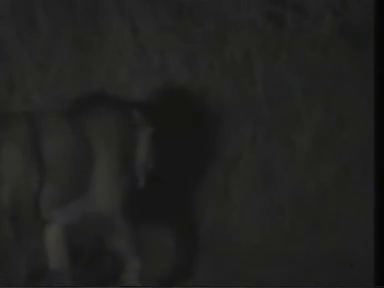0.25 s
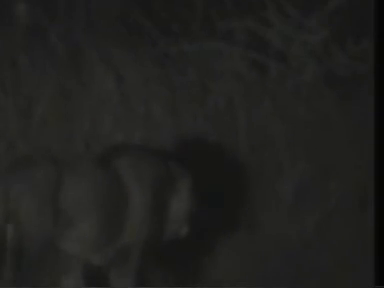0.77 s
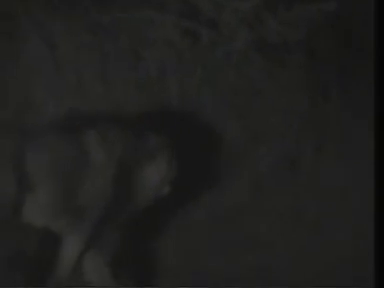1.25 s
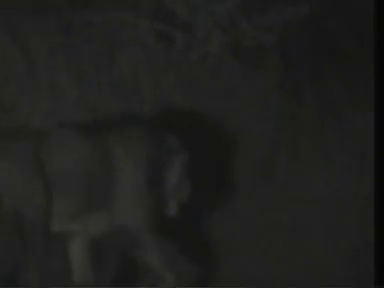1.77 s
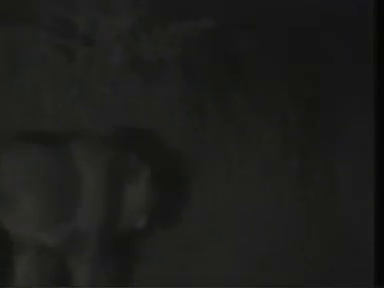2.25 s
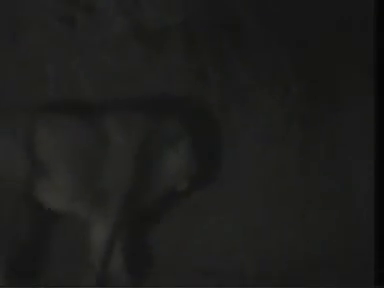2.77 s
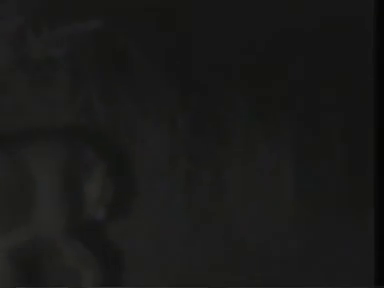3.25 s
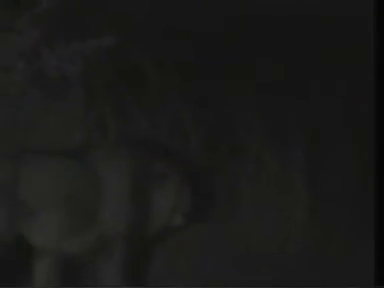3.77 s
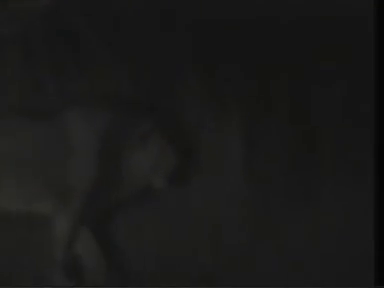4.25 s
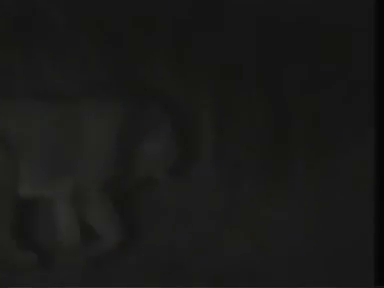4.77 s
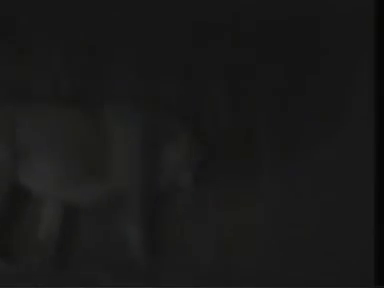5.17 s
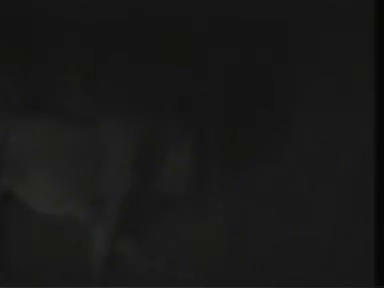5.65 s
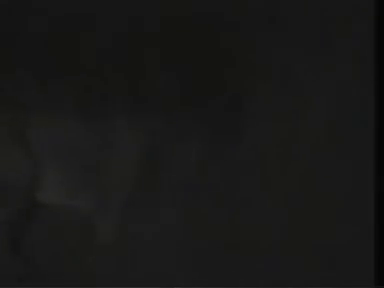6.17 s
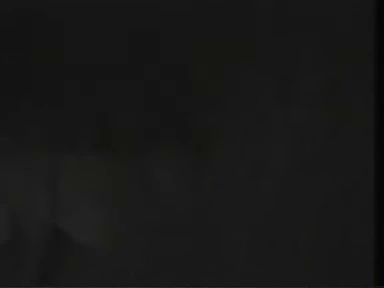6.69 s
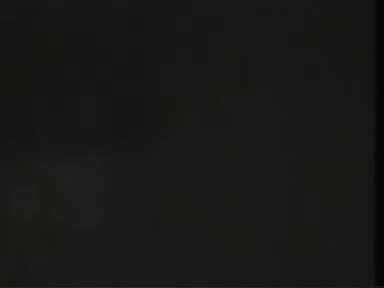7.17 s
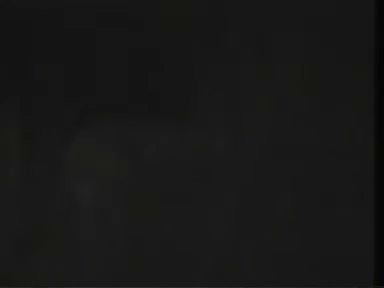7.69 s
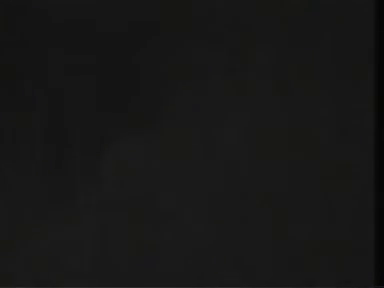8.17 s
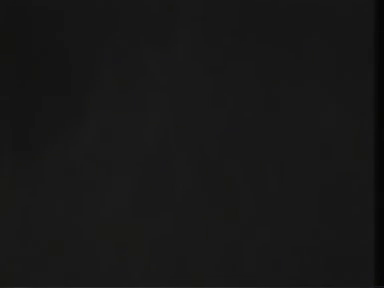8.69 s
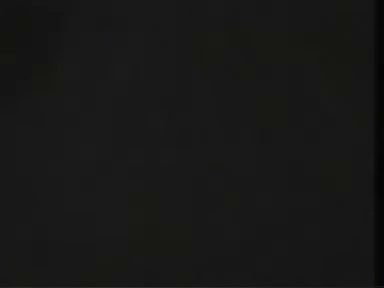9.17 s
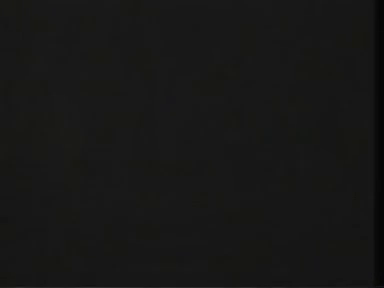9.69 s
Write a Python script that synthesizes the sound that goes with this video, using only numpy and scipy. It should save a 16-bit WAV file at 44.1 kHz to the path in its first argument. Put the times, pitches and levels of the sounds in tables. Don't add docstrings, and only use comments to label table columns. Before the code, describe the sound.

Three deep, almost pure-toned lion roars with raspy, breathy edges come first, followed by eight brief grunts about three quarters of a second apart, slowly fading. Behind them are a low fluttering engine, a wavering hum, a couple of dull rattling knocks, constant camera hiss with thin motor whine, and low wind puffs. Open grassland gives only a slight scattered tail; the raw one-sided pickup favours the right.

```python
import sys
import numpy as np
from scipy import signal
from scipy.fft import rfft, irfft, next_fast_len
from scipy.io import wavfile
from scipy.ndimage import uniform_filter1d, map_coordinates

SR = 44100
rng = np.random.default_rng(int(sys.argv[2]) if len(sys.argv) > 2 else 0)


def to_linear_factor(level_db):
    exponent = np.asarray(level_db, float) / 20
    return 10 ** exponent


def to_wav(sig):
    pcm = np.clip(np.atleast_2d(sig), -1, 1) * 32767
    pcm = np.round(pcm).astype(np.int16)
    wavfile.write(sys.argv[1], SR, pcm.T)


N = 437913
TIME = np.arange(N) / SR

# full voice t/s, hold/s, chest tone level/dB, lowest throat resonance f/Hz, mouth opening level/dB
GRUNTS = [
    (4.657, 0.066, -15, 175, -21.5),
    (5.466, 0.091, -18, 180.3, -10.5),
    (6.255, 0.083, -17, 172, -10),
    (7.002, 0.067, -16.5, 170, -10),
    (7.704, 0.066, -16.5, 166.3, -11),
    (8.387, 0.056, -16.5, 169.3, -8.5),
    (9.052, 0.054, -18, 164.4, -8.5),
    (9.704, 0.061, -18.5, 165, -7),
]


def unit(x):
    return x / np.sqrt(np.mean(np.abs(x) ** 2) + 1e-20)


def curves(rows):
    s, *cols = np.transpose(rows)
    return [np.interp(TIME, s, c) for c in cols]


def wobble(rate, depth_db=None):
    coarse = np.arange(0, N + 64, 64)
    knots = rng.standard_normal(int(N * rate / SR) + 4)
    smooth = map_coordinates(knots, [coarse * rate / SR])
    return np.interp(np.arange(N), coarse, smooth if depth_db is None else to_linear_factor(depth_db * smooth))


def along(points, hz):
    f, v = np.transpose(points)
    return np.interp(np.log(hz + 1), np.log(f + 1), v)


def noise(spectrum):
    m = next_fast_len(N)
    gain = to_linear_factor(along(spectrum + [(SR / 2, -120)], np.fft.rfftfreq(m, 1 / SR)))
    return unit(irfft(rfft(rng.standard_normal(m)) * gain, m)[:N])


def resonate(x, modes, shift=1, drift_db=0):
    turns = 2 * np.pi * np.cumsum(np.ones(N) * shift) / SR
    out = np.zeros(N)
    for hz, width_hz, db in modes:
        spin, pole = np.exp(1j * hz * turns), np.exp(-np.pi * width_hz / SR)
        still = signal.lfilter([1], np.convolve([1, -pole], [1, -pole ** 2]), x * spin.conj())
        still = still / np.sqrt(uniform_filter1d(np.abs(unit(still)), size=1800) + .2)
        out += to_linear_factor(db) * wobble(14, drift_db) * np.real(unit(still) * spin)
    return unit(out)


def puffs(rate, scatter, spread_db, life):
    beat = np.floor(np.cumsum(rate * (1 + scatter * wobble(30))) / SR)
    starts = np.diff(beat, prepend=0) > 0
    draws = to_linear_factor(spread_db * rng.standard_normal(int(N * 120 / SR)))
    sizes = draws[np.clip(beat, 0, None).astype(int)]
    return unit(signal.lfilter([1], [1, -np.exp(-1 / (life * SR))], starts * sizes))


def engine(drone_db):
    # f/Hz, spectral level/dB per Hz
    body_spectrum = [(35, -46.5), (60, -19.5), (113, -6.5), (155, 1), (200, -11), (260, -10), (380, -14),
                     (450, -8.5), (650, -10.5), (1030, -16), (1370, -15), (2000, -27), (2600, -54)]
    firing_hz = 16.5 + 0.92 * TIME
    firing = puffs(firing_hz, scatter=0.033, spread_db=-2.5, life=0.026)
    throb = .9 + np.interp(TIME, [0, 9.9], [1.3, .3]) * firing
    stolen_db = 0.85 * np.clip(drone_db + 45.5, 0, None)
    level_db = -57.5 + 0.44 * TIME - stolen_db + 4.0 + 1.7 * wobble(3.04)
    return unit(noise(body_spectrum) * throb) * to_linear_factor(level_db)


def knocks():
    # t/s, peak level/dB, body t60/s, crack level/dB
    hits = [
        (6.493, -31, .2, -1),
        (9.3805, -24, .07, -3),
    ]
    # f/Hz, width/Hz, level/dB
    panel = [(600, 710, 11.5), (840, 40, -9), (1093, 27, -1.5)]
    # f/Hz, width/Hz, level/dB
    crack = [(1300, 600, 0), (1750, 500, -1), (5500, 5500, -12)]

    def dying(s, db, t60):
        return np.clip((TIME - s) / 0.002, 0, 1) * to_linear_factor(db - 60 * np.clip(TIME - s, 0, 1) / t60)

    thud = sum(dying(s, db - 4.5, t60) for s, db, t60, _ in hits)
    snap = sum(dying(s, db + crack_db, 0.088 * t60) for s, db, t60, crack_db in hits)
    shake = rng.standard_normal(N)
    return thud * resonate(shake, panel) + snap * resonate(shake, crack)


def vehicle():
    # t/s, level/dB
    drone_levels = [(0, -66), (.7, -64), (1.68, -62), (1.8, -53.5), (2.2, -49.5), (3.3, -47), (4.3, -50.5),
                    (5.2, -54.5), (6, -53), (6.75, -46), (7.4, -48), (8.1, -52.5), (8.8, -62),
                    (9.45, -45.5), (9.93, -53)]
    drone_db, = curves(drone_levels)
    turns = np.cumsum(418 + 2.42 * wobble(10)) / SR
    drone = np.sin(2 * np.pi * turns) * to_linear_factor(drone_db - 0.5 + 0.95 * wobble(21))
    return engine(drone_db) + drone + knocks()


def camera():
    # t/s, level/dB
    camera_levels = [(0, -55), (3.1, -55.5), (6.3, -52), (9.93, -50.5)]
    # f/Hz, spectral level/dB per Hz
    housing = [(880, -36), (1500, -1.5), (2030, -2.5), (2520, -1), (2600, 0.5), (2900, 2.5), (3070, -0.5),
               (3420, 2), (3810, -4.5), (5280, -8), (6420, 0), (7890, -15), (9700, -10.5), (11400, -22),
               (15700, -46.5)]
    order_db = [-62.5, -65.5, -72.5, -69.5, -74, -71.5, -66.5, -65.5, -65, -76, -74.5, -77]
    # f/Hz, level/dB rms
    gears = [(1168, -69.5), (1981, -75), (2627, -71), (3214, -74.5), (3370, -72.5), (3533, -73),
             (3585, -75), (5760, -75), (5981, -81.5), (6205, -68.5), (6255, -76), (6428, -71.5),
             (6481, -71.5), (9588, -82.5)]
    motor_hz, orders = 222.6, np.array([2, 4, 8, 9, 10, 11, 12, 13, 15, 18, 19, 20])
    level_db, = curves(camera_levels)
    speed = np.cumsum(1 + .0006 * wobble(12)) / SR
    lines = np.zeros(N)
    for hz, db in [*zip(motor_hz * orders, order_db), *gears]:
        line = np.sin(2 * np.pi * (hz * speed + rng.random()))
        lines += to_linear_factor(db + 4.0) * wobble(25, depth_db=3.0) * line
    hiss = noise([(20, -65), (900, -17)] + housing[1:]) * to_linear_factor(0.37 * wobble(14))
    return to_linear_factor(level_db - 1.76) * hiss + to_linear_factor(level_db - level_db.mean() - 1.63) * lines


def wind():
    # t/s, peak level/dB
    gusts = [(.01, -39), (.22, -35), (.41, -33), (.58, -38), (.9, -30), (1.35, -56), (1.98, -43),
             (2.35, -35), (3.4, -48), (3.76, -40), (4.17, -28.5), (4.749, -29), (5.09, -40), (5.4, -39),
             (5.75, -36.5), (5.97, -45), (6.65, -46), (7.109, -58), (9.099, -42), (9.801, -40)]
    # f/Hz, spectral level/dB per Hz
    buffet = [(15, -6.5), (30, -6.5), (50, 1), (90, -6.5), (140, -38.5), (250, -64)]
    # t/s, peak level/dB
    bumps = [
        (0.189, -46),
        (0.41, -34),
        (1.921, -31),
        (2.332, -44),
        (4.144, -54),
    ]
    calm_db, rise, fall = -53.5, 165, 210
    t = TIME[::64]
    level_db = np.max([db - np.maximum(rise * (s - t), fall * (t - s)) for s, db in gusts], axis=0)
    level_db = np.interp(TIME, t, level_db.clip(calm_db))
    pushes = np.zeros(N)
    for s, db in bumps:
        cycle = np.sin(2 * np.pi * 50 * (TIME - s)) * (TIME > s)
        pushes += to_linear_factor(db - 9.0) * cycle * np.exp(-np.abs(TIME - s) / 0.032)
    return to_linear_factor(level_db - 10.5) * unit(noise(buffet) * to_linear_factor(4.5 * wobble(18))) + pushes


def arch(chest_hz):
    roar_arches = [
        (0.933, 1.024, 1.12, 285, -7),
        (2.45, 2.524, 2.66, 250.6, -12.5),
        (3.619, 3.687, 3.76, 238.4, -6),
    ]
    grunt_arches = [(s - 0.0249, s + 0.034, s + .11, 1.28 * hz, -12 - .8 * k)
                    for k, (s, _, _, hz, _) in enumerate(GRUNTS)]
    lift_hz, gain = np.zeros(N), np.zeros(N)
    for start, top, end, top_hz, db in roar_arches + grunt_arches:
        climb = np.interp(TIME, [start, top, end], [0, 1, 0])
        lift_hz += climb ** .8 * (top_hz - chest_hz)
        gain += to_linear_factor(db - 2.5 * climb) * np.clip(3 * climb, 0, 1)
    turns = np.cumsum((chest_hz + lift_hz) * (1 + 0.036 * wobble(70))) / SR
    return np.sqrt(2) * gain * to_linear_factor(2.6 * wobble(60)) * np.sin(2 * np.pi * turns)


def chest(chest_hz, phase, rasp_db, blows):
    # t/s, depth level/dB, half width/s
    slips = [(.965, 1.5, 0.02), (1.01, 11, 0.024), (1.077, 12, 0.015), (1.145, -4.5, 0.031),
             (1.224, 10, 0.0079), (1.47, 3, 0.0099), (2.491, 3, 0.0086), (2.53, 1.5, 0.0084),
             (2.783, 12, 0.027), (3.652, 7, 0.0052), (3.7, 11, 0.0098), (4.71, 18, 0.013),
             (5.49, 11, 0.0087), (5.516, 21, 0.0055), (6.321, 7, 0.0063), (7.03, 8.5, 0.0077),
             (7.107, 1, 0.0048), (8.419, 28, 0.0066), (9.111, 3, 0.0042), (9.742, 28, 0.0094)]
    t = TIME[::16]
    slip_db = np.interp(TIME, t, sum(db * np.exp(-((t - s) / width) ** 2) for s, db, width in slips))
    rough = np.clip((rasp_db + 17) / 28, .025, .3)
    tone = np.sin(phase) + to_linear_factor(-31.0) * np.sin(2 * phase)
    tone = np.sqrt(2) * to_linear_factor(1.1 * wobble(50) - slip_db) * tone
    drive = blows + 0.81 * rng.standard_normal(N)
    rattle = resonate(drive, [(1, 34.2, 0), (1.4, 42.6, -5.5)], chest_hz)
    return np.sqrt(1 - rough) * tone + np.sqrt(rough) * rattle + arch(chest_hz)


def throat(drive, shut, depth):
    # f/Hz, width/Hz, level/dB
    middle = [(431.3, 57, 8.5), (315, 15, -8)]
    # f/Hz, width/Hz, level/dB
    pharynx = [(626.4, 48, 0), (548, 13, -8.5), (703, 5.8, -21.5)]
    rasp = resonate(drive, middle, 1.014 - depth * shut ** 1.78, drift_db=3.0)
    late_db = 4 * shut ** 3
    pharynx_db = -7 - 0.85 * TIME + late_db / 2
    upper = resonate(drive, pharynx, 1 - depth * shut / 2, drift_db=2.7)
    return to_linear_factor(-late_db) * rasp + to_linear_factor(pharynx_db) * upper


def mouth(drive, shut):
    # f/Hz, width/Hz, level/dB
    mouth_open = [(823, 43, -8.5), (950, 78, 2), (1089, 107, 0), (1205, 106, 2.5), (1500, 370, -6)]
    # f/Hz, width/Hz, level/dB
    mouth_shut = [(953, 38, -7.5), (1165, 100, -4), (1488, 145, 4), (1647, 19, -6.5)]
    early = resonate(drive, mouth_open, drift_db=4.0)
    late = resonate(drive, mouth_shut, drift_db=4.0)
    return np.sqrt(1 - shut) * early + np.sqrt(shut) * late


def grunt(full, hold, db, hz):
    end = full + hold
    dropped = end + .045
    s = [full - .06, full - .026, full, full + .034, end, dropped, dropped + .065, dropped + .065 + .035]
    scoop, sag, fall = .05, .065, .15
    lost = np.array([scoop, scoop / 2, 0, sag / 2, sag, (sag + fall) / 2, fall, fall])
    under_db = np.array([29, 7, 0, 2, 0, 13, 21, 36])
    air_under_db = np.array([22, 16.5, 11, 0, 2, 6, 15, 24])
    return list(zip(s, hz * (1 - lost), db - under_db, db - 16.5 - air_under_db))


def lion():
    # t/s, lowest throat resonance f/Hz, chest tone level/dB, air flow level/dB
    roars = [
        [(.883, 186.2, -37, -48.5), (.935, 197.2, -14.5, -38), (.96, 215, -23.5, -32.5),
         (1.036, 199.5, -24, -28), (1.104, 177, -19.5, -33.5), (1.33, 169, -17.5, -33), (1.45, 158, -21, -34.5),
         (1.55, 150, -33, -37), (1.64, 136, -45, -58)],
        [(2.401, 179, -46.5, -52), (2.429, 182.2, -22.5, -47.5), (2.469, 184.5, -14.5, -37),
         (2.533, 178.6, -16.5, -29), (2.561, 170.8, -13.5, -35.5), (2.669, 153.3, -20.5, -40),
         (2.761, 157.6, -20, -33.5), (2.823, 136.4, -33, -42.5), (2.88, 140, -45, -43.5)],
        [(3.597, 178, -38, -55), (3.625, 184, -22.5, -39.5), (3.658, 178, -22.5, -36.5), (3.716, 169, -21, -33),
         (3.754, 159.2, -20, -36), (3.812, 156.3, -31, -39.5), (3.852, 137.1, -29.5, -39),
         (3.972, 133, -30.5, -42.5), (4.02, 130.8, -50, -55)],
    ]
    # f/Hz, width/Hz, level/dB
    breath_modes = [(2270, 300, 8.5), (3120, 230, -3.5), (3630, 1760, 8), (5290, 2700, -6)]
    calls = roars + [grunt(*row[:-1]) for row in GRUNTS]
    rows = []
    for call in calls:
        first, last = call[0], call[-1]
        rows += [(first[0] - .03, first[1], -75, -85), *call, (last[0] + 0.03927, last[1], -75, -85)]
    chest_hz, chest_db, air_db = curves(rows)

    edges = [row[0] for call in calls for row in (call[0], call[-1])]
    shut = np.interp(TIME, edges, [0, 1] * len(calls))
    sink = [0.099, 0.13, 0.46] + [.16] * len(GRUNTS)
    depth = np.interp(TIME, edges, np.repeat(sink, 2))
    opening = [-14, -13.5, -15.5] + [row[-1] for row in GRUNTS]
    opening_db = np.interp(TIME, edges, np.repeat(opening, 2))

    rasp_db = air_db - chest_db
    snarl_db = opening_db - 3 * shut + (1 - .3) * rasp_db
    trailing_air_db = np.interp(TIME - 0.023, TIME, air_db)
    breath_db = -53.5 + 0.91 * TIME + 0.93 * (trailing_air_db + 33) - chest_db

    flaps = puffs(45 * np.ones(N), scatter=.25, spread_db=2.5, life=0.011)
    blows = unit(np.diff(flaps, prepend=0).clip(0))
    phase = 2 * np.pi * np.cumsum(chest_hz * (1 + 0.01977 * wobble(45))) / SR
    air = unit(rng.standard_normal(N) * (0.8 + 0.3 * np.sin(phase)) * (1.3 + flaps))

    voice = chest(chest_hz, phase, rasp_db, blows)
    voice = voice + to_linear_factor(rasp_db + 0.5) * throat(air + .5 * blows, shut, depth)
    voice = voice + to_linear_factor(snarl_db) * mouth(air + 0.33 * blows, shut)
    voice = voice + to_linear_factor(breath_db) * resonate(air, breath_modes, drift_db=1.0)
    head = signal.butter(4, 100, "high", fs=SR, output="sos")
    radiated = signal.sosfilt(head, to_linear_factor(chest_db - 0.56) * voice)
    under = shut * to_linear_factor(-29 + 4 * wobble(20)) * np.sin(phase / 2)
    return to_linear_factor(chest_db) * under + radiated


def bush(x):
    # f/Hz, t60/s
    ground = [(100, 0.39), (500, 0.26), (2000, 0.51), (8000, 0.22)]
    hz, t, z = signal.stft(rng.standard_normal(SR // 3), SR, nperseg=256)
    tail = signal.istft(z * to_linear_factor(-60 * t / along(ground, hz)[:, None]), SR, nperseg=256)[1]
    return signal.fftconvolve(x, tail / np.linalg.norm(tail))[:N]


def scene():
    background = vehicle() + camera() + wind()
    voice = lion()
    heard = background + voice + to_linear_factor(-18) * bush(voice)
    return np.array([np.zeros(N), to_linear_factor(5) * heard])


def top_cut(x):
    return signal.sosfilt(signal.butter(12, 16230, fs=SR, output="sos"), x)


def record(dry):
    # f/Hz, level/dB rms
    clock = [(387.8, -109), (775.6, -64.5), (1924.2, -117), (2943.4, -108), (4867.7, -74.5),
             (12435.1, -67.5), (14359.2, -78), (15624.1, -73.5)]
    tones = sum(to_linear_factor(db + 1) * np.sin(2 * np.pi * hz * TIME) for hz, db in clock)
    hiss = to_linear_factor([[-60], [-70]]) * rng.standard_normal((2, N))
    held = dry / (1 + np.abs(dry / .6) ** 4) ** (1 / 4)
    wired = held + hiss + to_linear_factor([[-1.5], [-18]]) * tones
    limited = irfft(rfft(wired) * (np.fft.rfftfreq(N, 1 / SR) < 15760), N)
    return top_cut(limited)


dry = scene()
out = record(dry)
to_wav(out)
```